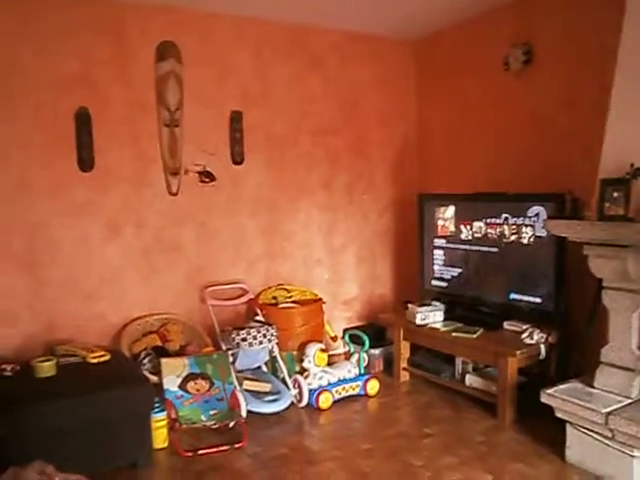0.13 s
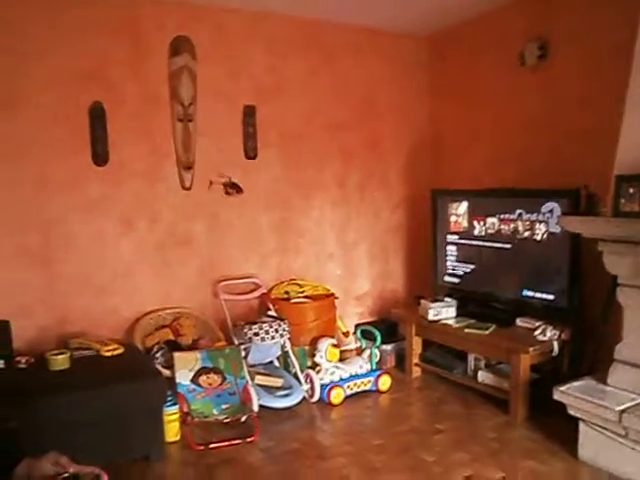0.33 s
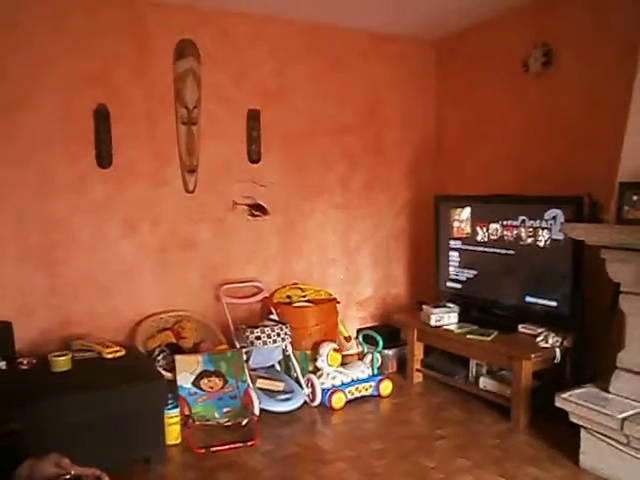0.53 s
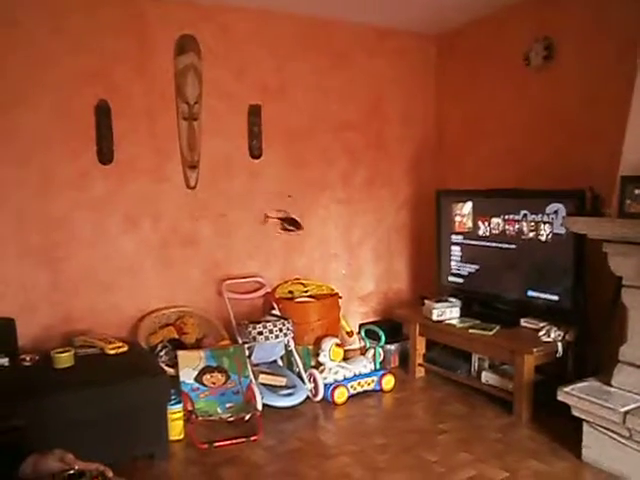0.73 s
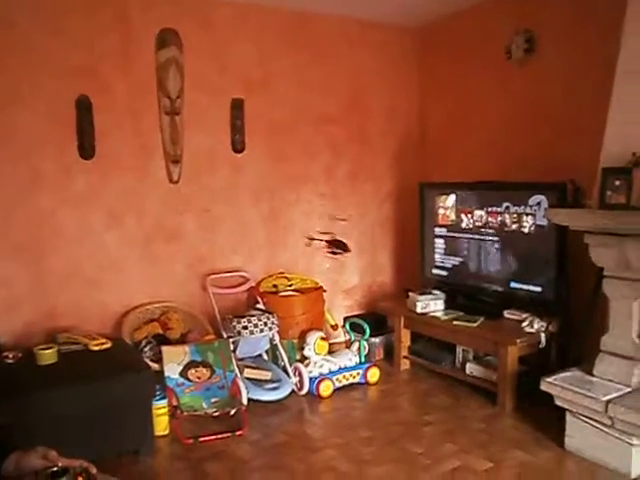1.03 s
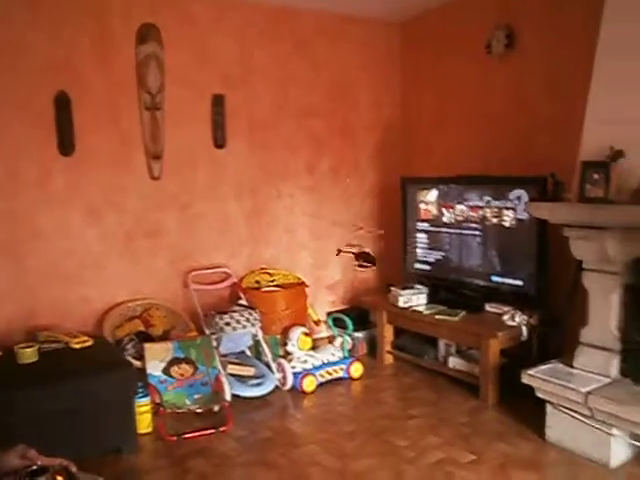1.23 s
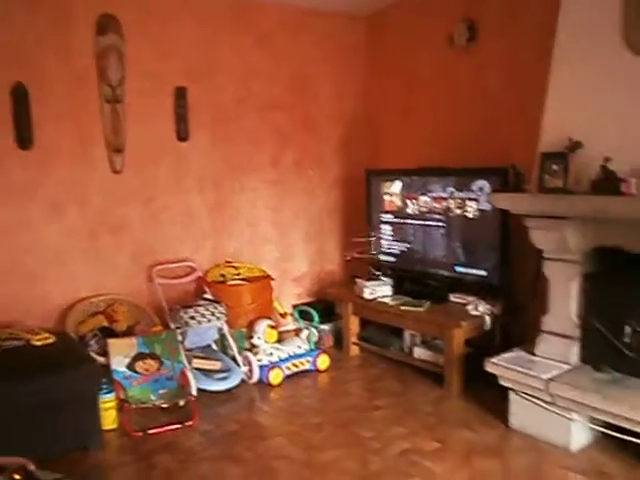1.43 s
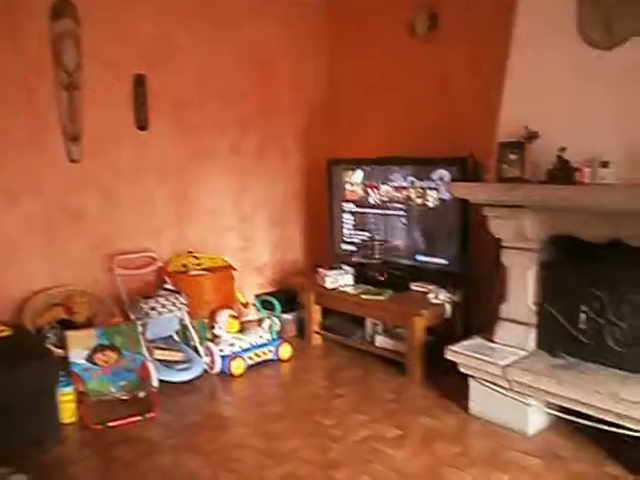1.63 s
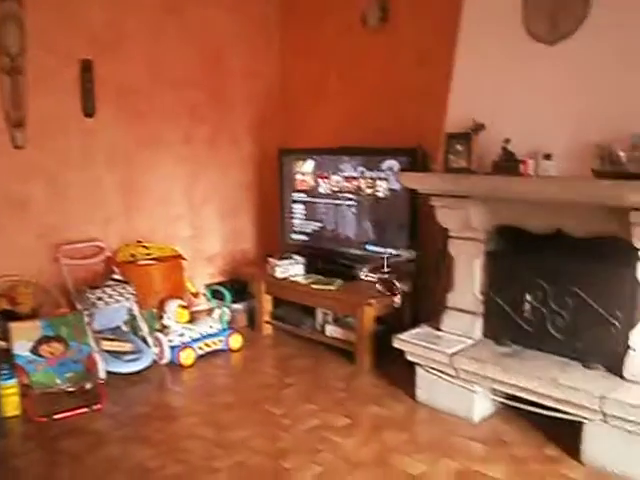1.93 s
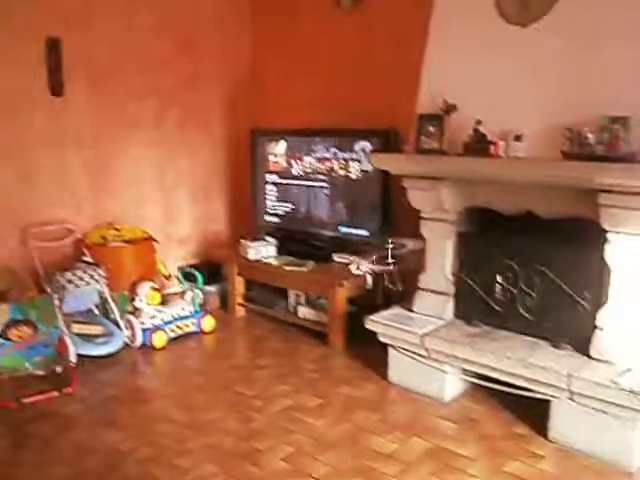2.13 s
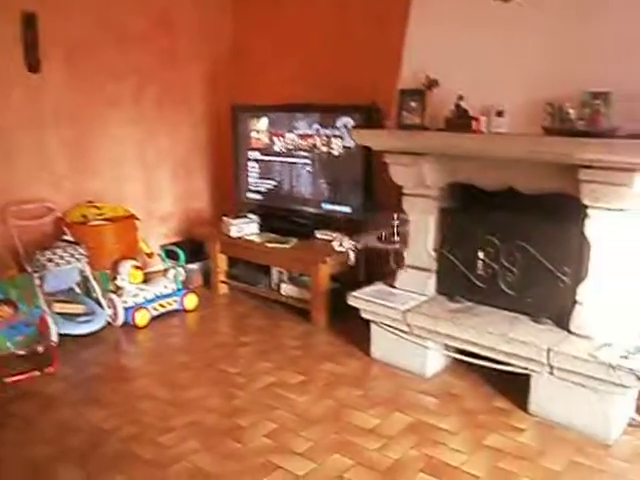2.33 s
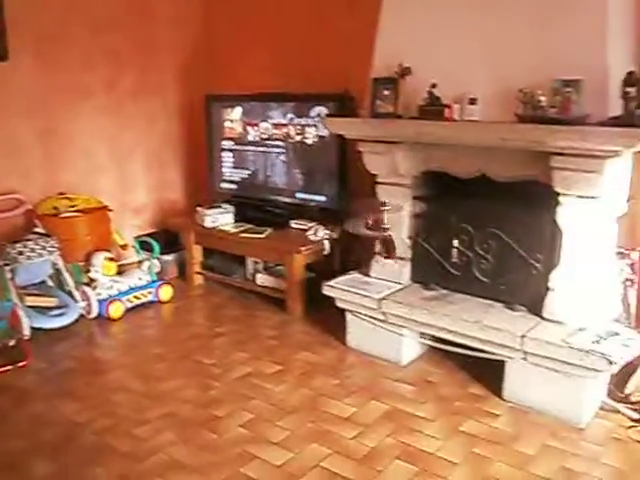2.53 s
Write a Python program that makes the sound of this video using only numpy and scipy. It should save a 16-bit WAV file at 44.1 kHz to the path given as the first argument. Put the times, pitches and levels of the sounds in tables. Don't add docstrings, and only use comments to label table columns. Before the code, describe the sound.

A toy helicopter whirs continuously in a hard-floored living room. Its thin, buzzy whine around 1600 Hz swells and dips over faint hum and steady rotor hiss. Small plastic clicks from the hand control cluster near 0.4 and 0.85 seconds, with faint creaks later. From about 1.85 the motor revs slightly, peaks near 2.15, then sinks by 2.6 as the rotor hiss grows a little. Narrow, lo-fi microphone sound.

```python
import sys
import numpy as np
from scipy import signal
from scipy.fft import rfft, irfft, next_fast_len
from scipy.io import wavfile
from scipy.ndimage import uniform_filter1d, map_coordinates

SR = 44100
rng = np.random.default_rng(int(sys.argv[2]) if len(sys.argv) > 2 else 0)


def volts_from_decibels(level):
    exponent = np.asarray(level, float) / 20
    return 10 ** exponent


def to_wav(sig):
    pcm = np.clip(np.atleast_2d(sig), -1, 1) * 32767
    pcm = np.round(pcm).astype(np.int16)
    wavfile.write(sys.argv[1], SR, pcm.T)


N = 118188
T = np.arange(N) / SR

# time in seconds, shaft turns per second in Hz.
MOTOR_SPEED = [
    (0, 202.3),
    (.6, 201.9),
    (1, 203.1),
    (1.8, 204.8),
    (1.95, 212.5),
    (2.14, 217),
    (2.3, 214.3),
    (2.55, 202.5),
    (2.68, 199),
]
# time in seconds, level in dB.
WHINE_LEVEL = [(0, -56), (.12, -41.5), (.41, -34.5), (.5, -46.5), (.59, -36), (.85, -45), (1.01, -34),
               (1.14, -43.5), (1.28, -37.5), (1.39, -54), (1.49, -38.5), (1.72, -42.5), (1.85, -44),
               (2.13, -35), (2.25, -52), (2.36, -37), (2.5, -36), (2.68, -41.5)]
# time in seconds, level in dB.
HUM_LEVEL = [(0, -54), (.3, -50), (.55, -57.5), (1, -63), (1.15, -51.5), (1.72, -51.5), (1.86, -53),
             (1.96, -47.5), (2.42, -46), (2.5, -53.5), (2.68, -47)]
# time in seconds, depth in dB.
WHINE_NULLS = [
    (1.92, 3),
    (1.983, 8),
    (2.04, 10),
    (2.33, 9),
    (2.415, 7),
    (2.54, 6),
]
# multiple of shaft speed, level in dB under the hum, share of its fading (ratio).
SHAFT_ORDERS = [(2, -7.5, 1.2), (3, -4, 1.14), (4, -3, 0.7), (6, -11.5, 0.9), (12, -4.5, 0.1),
                (16, -10.5, 0.1)]
# time in seconds, level in dB.
ROTOR_LEVEL = [(0.0, -39), (0.63, -37.5), (0.88, -38), (2.22, -36.5), (2.68, -35.5)]
# frequency in Hz, gain in dB.
RUSH_COLOUR = [(30, -19.5), (130, -9), (520, -6.5), (680, -2), (1270, 0), (1750, -2.5), (2300, -35.5),
               (3960, -120)]
# frequency in Hz, gain in dB.
HISS_COLOUR = [(1300, -34), (1800, -5), (2000, -2), (2500, -2), (3100, 0.5), (3700, -0.5), (4100, -2),
               (4400, -120)]
# pitch in Hz, width in Hz, level in dB,
# loudest moment in seconds, spread in seconds.
BUZZ_TONES = [(690, 50, -56, 1.9, 0.52), (846, 37, -41.5, .57, .07), (1274, 50, -42.5, .1, 0.06),
              (1283, 31, -41.5, 1.493, .06), (1301, 53, -44, 2.2, 0.26), (1478, 47, -49, 1.55, 0.58),
              (1777, 100, -51.5, 0.98, 0.3), (1299, 26, -48, 0.7, 0.051), (1560, 30, -51.5, 0.09, 0.28),
              (810, 87, -48.5, 0.35, 0.13)]
# centre in seconds, level in dB, pitch in Hz, length in seconds, brightness in dB.
CREAK_EVENTS = [(0.343, -36, 1000, .012, -24.5), (0.363, -33.5, 1260, 0.0096, -20),
                (0.371, -23.5, 1247, 0.0036, -15.5), (.379, -27, 1140, .007, -6.5),
                (.395, -34, 1245, 0.017, -12.5), (0.431, -27.5, 1103, 0.0046, -8),
                (0.452, -40, 870, 0.024, -22.5), (0.794, -30.5, 1245, .006, -9.5),
                (0.856, -35.5, 1070, 0.018, -1), (0.87, -27, 1282, 0.0043, -10.5),
                (0.882, -32.5, 960, .011, 1), (0.892, -34, 1277, 0.011, -7.5),
                (1.145, -35, 1298, 0.023, -20.5), (1.465, -34, 1262, 0.025, -19.5),
                (1.706, -40, 1220, 0.065, -15.5)]

GEAR_TEETH, FLICKER_DB, NULL_S = 8, 2.2, 0.011
RUSH_GROWS = 0.42
SHELL_WIDTH_HZ, RASP = 570, 0.82
BRIGHT_HZ, BRIGHT_WIDTH_HZ, SCRAPE_DB = 3180, 570, -1
ROOM_T60_S, ROOM_DB = 0.53, -9.5
SAMPLING_HZ, EDGE_HZ, EDGE_STEEP, OFFSET = 8000, 4084, 34.3, -0.0074


def unit(x):
    return x / np.sqrt(np.mean(x ** 2) + 1e-20)


def curve(rows):
    return np.interp(T, *np.transpose(rows))


def wobble(rate):
    knots = rng.standard_normal(int(N * rate / SR) + 4)
    return map_coordinates(knots, [T * rate])


def filtered(x, response):
    m = next_fast_len(N + SR // 2)
    return irfft(rfft(x, m) * response(np.fft.rfftfreq(m, 1 / SR)), m)[:N]


def resonance(hz, width_hz):
    return lambda f: 1j * f * width_hz / (hz * hz - f * f + 1j * f * width_hz)


def ringing_noise(shape, hz, width_hz):
    noise = rng.standard_normal(N)
    return unit(shape * filtered(noise, lambda f: resonance(hz, width_hz)(f) ** 2))


def motor():
    speed_hz = uniform_filter1d(curve(MOTOR_SPEED), 3000) + 0.15 * wobble(25)
    turns = 2 * np.pi * np.cumsum(speed_hz) / SR

    nulls_db = sum(depth_db * np.exp(-0.5 * ((T - s) / NULL_S) ** 2) for s, depth_db in WHINE_NULLS)
    flicker_db = FLICKER_DB * np.clip(T - 1.5, 0.25, 1) * wobble(24)
    whine = volts_from_decibels(curve(WHINE_LEVEL) - nulls_db + flicker_db) * np.sin(GEAR_TEETH * turns)

    hum_db = curve(HUM_LEVEL)
    mean_db = hum_db.mean()
    hum = volts_from_decibels(hum_db + 1.5 * wobble(12)) * np.sin(turns)

    out = whine + hum
    for multiple, db, share in SHAFT_ORDERS:
        order_db = mean_db + db + share * (hum_db - mean_db) + 0.75 * wobble(18)
        out = out + volts_from_decibels(order_db) * np.sin(round(multiple) * turns + rng.uniform(0, 6))
    return np.sqrt(2) * out


def turbulence(colour, patchy_db):
    z = signal.stft(rng.standard_normal(N + 512), nperseg=512)[2]
    patches = uniform_filter1d(rng.standard_normal(z.shape), 4, 0)
    patches = uniform_filter1d(patches, 10, 1)
    x = signal.istft(z * volts_from_decibels(patchy_db * unit(patches)), nperseg=512)[1][:N]
    f, db = np.transpose(colour)
    return unit(filtered(x, lambda hz: volts_from_decibels(np.interp(np.log(hz + 1), np.log(f + 1), db))))


def rotors():
    near_db = curve(ROTOR_LEVEL)
    mean_db = near_db.mean()
    shared_db = 0.91 * wobble(3.2) + 0.2 * wobble(14)
    rush_db = mean_db + RUSH_GROWS * (near_db - mean_db) + shared_db
    hiss_db = near_db + shared_db + 0.46 * wobble(55)
    rush = volts_from_decibels(rush_db) * turbulence(RUSH_COLOUR, patchy_db=0.07)
    hiss = volts_from_decibels(hiss_db) * turbulence(HISS_COLOUR, patchy_db=0.27)
    return rush + hiss


def buzz():
    out = np.zeros(N)
    for hz, width_hz, db, s, lasts in BUZZ_TONES:
        shape = np.exp(-0.5 * ((T - s) / lasts) ** 2)
        tone = ringing_noise(shape, hz, width_hz)
        out = out + volts_from_decibels(db) * np.sqrt(np.mean(shape ** 2)) * tone
    return out


def room(x, wet_db):
    tail = rng.standard_normal(SR // 2) * volts_from_decibels(-60 * T[:SR // 2] / ROOM_T60_S)
    delayed = np.pad(x, (200, 0))
    return x + volts_from_decibels(wet_db) * signal.fftconvolve(delayed, tail / np.linalg.norm(tail))[:N]


def creaks():
    out = np.zeros(N)
    for s, db, hz, length, bright_db in CREAK_EVENTS:
        shape = np.exp(-0.5 * ((T - s) / (length / 2)) ** 2)
        tone = unit(shape * np.sin(2 * np.pi * hz * (T - s)))
        shell = tone + RASP * ringing_noise(shape, hz, SHELL_WIDTH_HZ)
        scrape = volts_from_decibels(SCRAPE_DB) * ringing_noise(shape, 1700, 2500)
        top = ringing_noise(shape, BRIGHT_HZ, BRIGHT_WIDTH_HZ) + scrape
        burst = unit(shell) + volts_from_decibels(bright_db) * top
        out = out + volts_from_decibels(db) * np.sqrt(np.mean(shape ** 2)) * burst
    return room(out, ROOM_DB)


def scene():
    return (motor() + rotors() + buzz() + creaks())[None]


def low_pass(x):
    return signal.sosfilt(signal.butter(12, 5190, fs=SR, output="sos"), x)


def record(dry):
    below = filtered(dry[0], lambda hz: hz < SAMPLING_HZ / 2)
    mirrored = below * (1 + 2 * np.cos(2 * np.pi * SAMPLING_HZ * T))
    narrow = filtered(mirrored, lambda hz: 1 / (1 + (hz / EDGE_HZ) ** EDGE_STEEP) / (1 + (hz / 4400) ** 30))
    return low_pass(narrow[None] + OFFSET)


dry = scene()
out = record(dry)
to_wav(out)
```